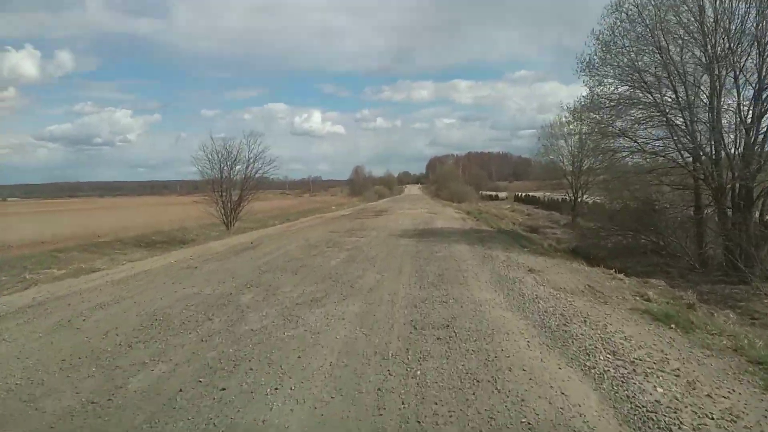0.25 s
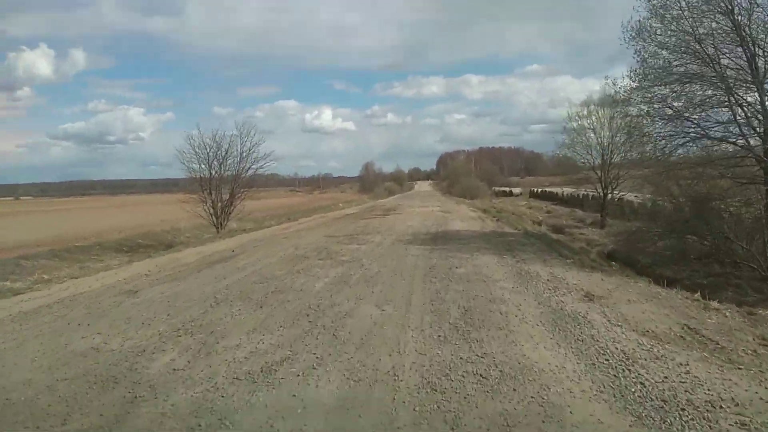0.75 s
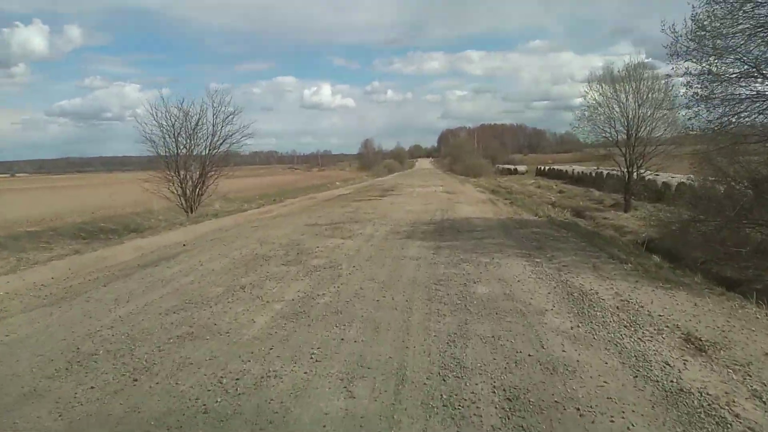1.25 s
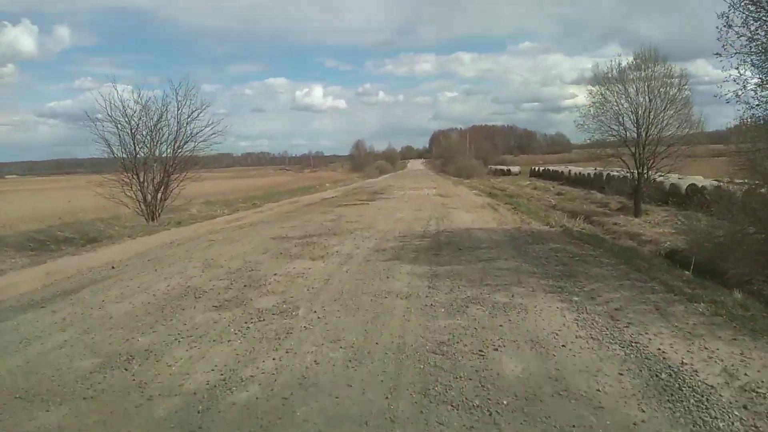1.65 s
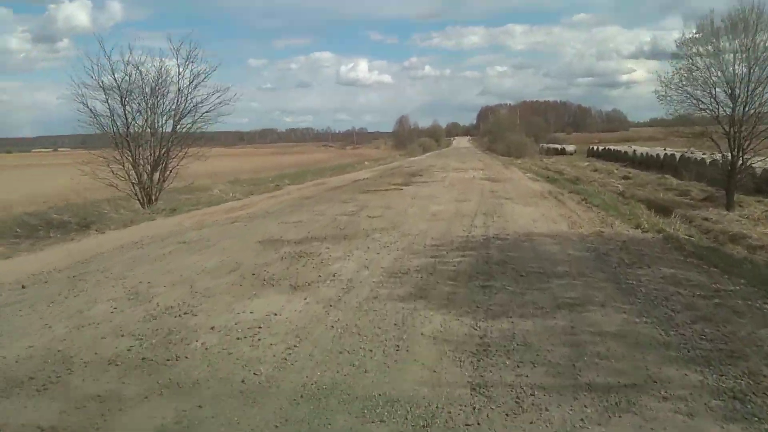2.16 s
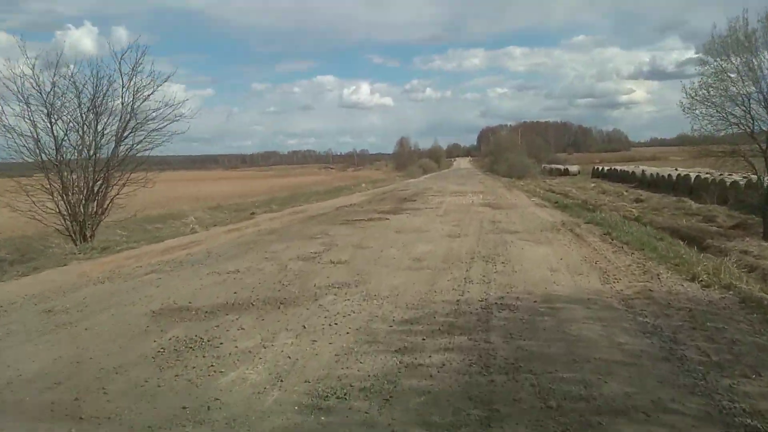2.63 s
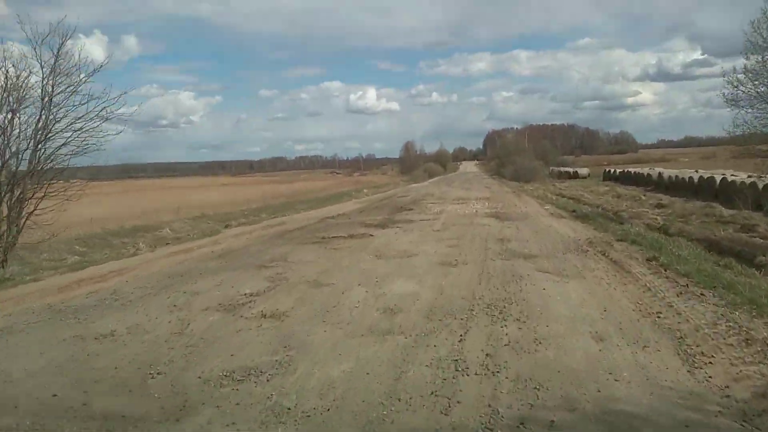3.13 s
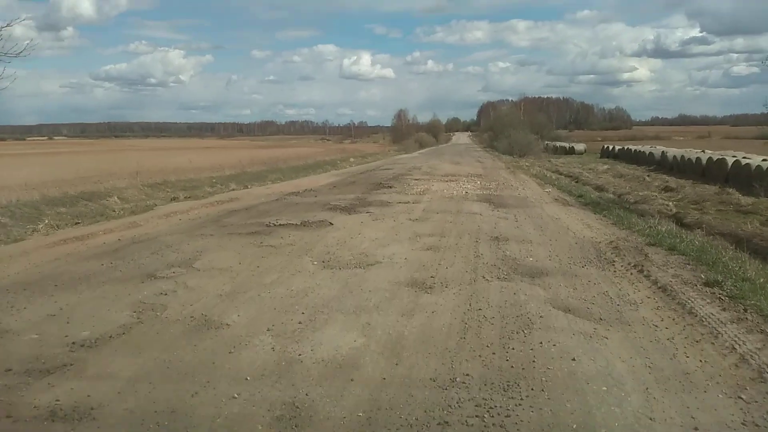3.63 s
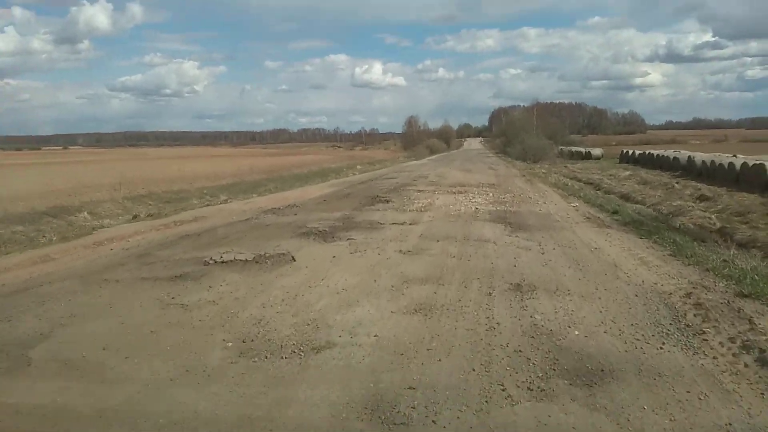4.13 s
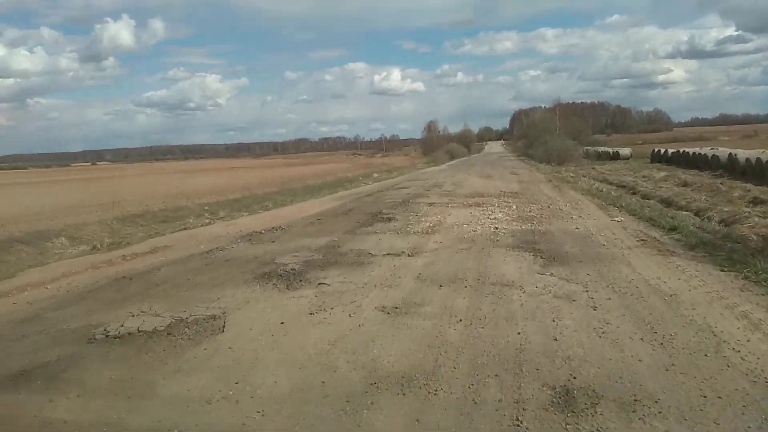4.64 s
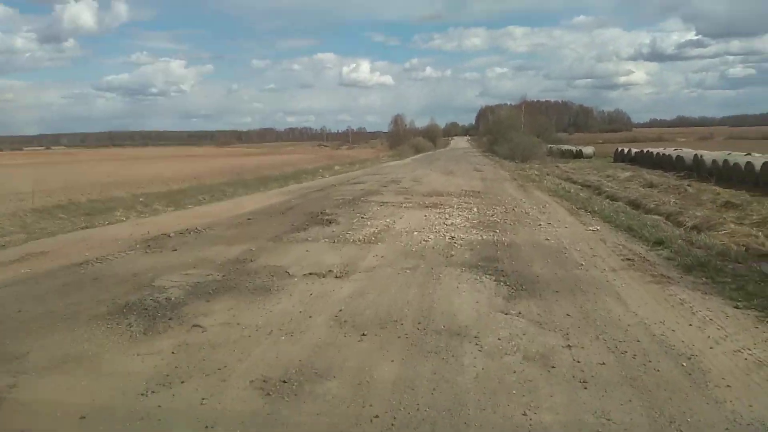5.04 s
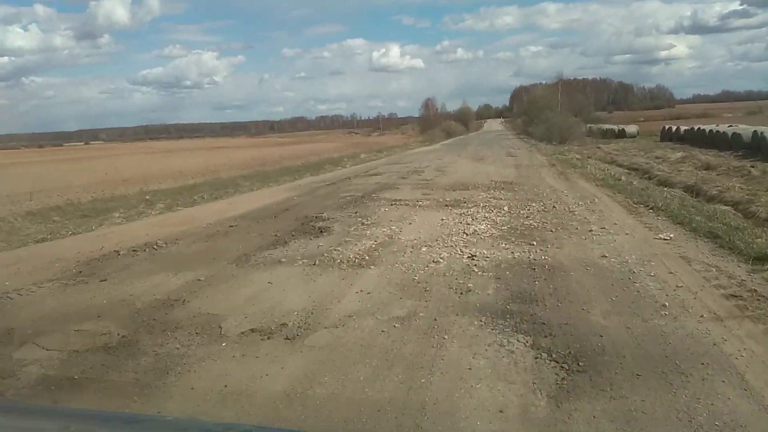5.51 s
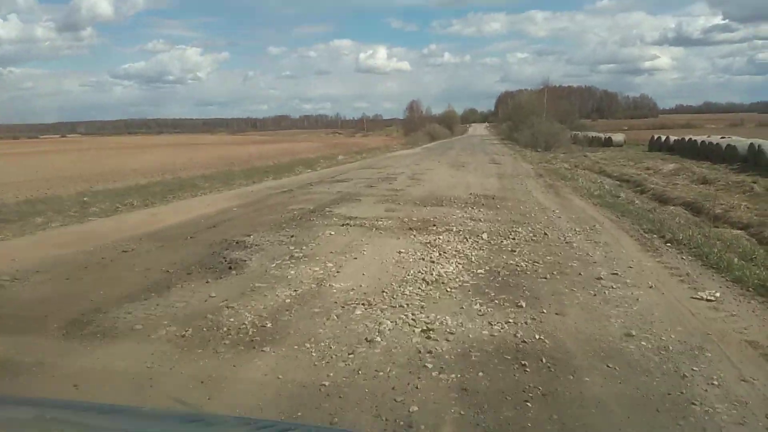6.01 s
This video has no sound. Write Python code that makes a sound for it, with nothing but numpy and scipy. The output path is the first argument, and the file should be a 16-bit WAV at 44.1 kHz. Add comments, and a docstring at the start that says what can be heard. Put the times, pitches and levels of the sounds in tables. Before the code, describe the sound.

A car drives over a potholed gravel road, heard from just behind the windscreen. A low boom fills the cabin while the tyres crunch over stones. Potholes bring frequent, uneven thumps and shudders, gravel sprays against the wheel arches in short bursts, and loose plastic trim ticks and rattles close by. The jolts bunch up around the middle, ease briefly near the end, then return.

```python
"""Gravel crunches and sprays against the underbody over a low boom: a car on a potholed road, heard
from a stereo microphone inside, just behind the windscreen. The road shakes the cabin air into that boom;
potholes knock through the suspension and make the body judder. Below the floor the tyres crush stones
and fling them at the wheel arches, while close by, loose trim ticks and rattles."""
import sys
import numpy as np
from scipy import signal
from scipy.fft import rfft, irfft, next_fast_len
from scipy.io import wavfile
from scipy.ndimage import uniform_filter1d

SR = 44100
rng = np.random.default_rng(int(sys.argv[2]) if len(sys.argv) > 2 else 0)


def bounce(signal):
    """Save signal as a 16-bit WAV file at the path given by the first command-line argument."""
    frames = np.transpose(np.atleast_2d(signal))
    limited = np.clip(frames, -1, 1)
    pcm = np.round(limited * 32767).astype(np.int16)
    wavfile.write(sys.argv[1], SR, pcm)


N = 276507

# potholes and ruts, levels before the mix: t/s, length/s, boom/dB, judder/dB, clunk/dB, first knock/dB
POTHOLES = [(0.065,0.059,-51,-30,-40.5,-46), (0.174,0.016,-43,-29.5,-33.5,-24),
            (0.233,0.069,-25.5,-28.5,-42.5,-16), (0.412,0.058,-40,-23.5,-45,-27),
            (0.78,0.073,-28,-30,-42.5,-24), (0.848,0.063,-44,-26.5,-45,-15.5),
            (1.072,0.12,-54,-30.5,-43,-20), (1.305,0.12,-49,-27,-41.5,-20), (1.447,0.11,-42,-28,-38.5,-21),
            (1.58,0.018,-42,-24,-47,-28), (1.799,0.12,-29.5,-35.5,-44.5,-53),
            (1.887,0.061,-33,-21.5,-36,-28), (2.016,0.034,-49,-30,-48,-26),
            (2.118,0.021,-28.5,-29,-45.5,-27), (2.168,0.082,-33,-30.5,-41.5,-15),
            (2.259,0.091,-46,-26.5,-42.5,-24), (2.408,0.08,-34,-31.5,-42.5,-25.5),
            (2.559,0.02,-24,-25.5,-40.5,-28), (2.609,0.063,-23,-31.5,-43,-17),
            (2.912,0.11,-52,-32.5,-47,-51), (3.103,0.13,-30.5,-25.5,-48.5,-14),
            (3.221,0.13,-27,-23.5,-40,-21), (3.372,0.09,-32,-27.5,-40.5,-19.5),
            (3.571,0.061,-34,-25,-47,-16.5), (3.672,0.025,-43,-28.5,-49,-20.5),
            (3.804,0.11,-28.5,-27,-40.5,-30), (4.037,0.096,-36,-27,-48.5,-14.5),
            (4.429,0.043,-30.5,-25,-41.5,-11.5), (4.78,0.044,-36.5,-37,-82,-37),
            (4.862,0.046,-30,-29.5,-54,-16.5), (5.007,0.077,-26.5,-23.5,-48.5,-26),
            (5.07,0.11,-26.5,-23.5,-51,-44), (5.29,0.0062,-40,-40,-60,-23),
            (5.331,0.069,-28.5,-66,-65.5,-56), (5.737,0.073,-54,-27,-45.5,-48),
            (5.864,0.018,-32.5,-26.5,-58,-38), (5.983,0.021,-49,-27.5,-66,-20),
            (6.065,0.039,-32,-23.5,-41.5,-23)]
def bumps():
    """Gains of boom, judder and clunk as a wheel runs through a pothole; each dies at its own rate."""
    boom_gain = swell([(s, length, 0.015, db) for s, length, db, *_ in POTHOLES], release_s=0.046)
    judder_gain = swell([(s, length, 0.0043, db) for s, length, _, db, *_ in POTHOLES], release_s=0.035)
    clunk_gain = swell([(s, length, 0.0043, db) for s, length, *_, db, _ in POTHOLES], release_s=0.041)
    return boom_gain, judder_gain, clunk_gain


# the road between potholes: t/s, crunch level/dB, boom level/dB
ROAD_SURFACE = [(0.0, -39, -34.5), (0.249, -61, -30.5), (0.327, -42.5, -30.5), (1.242, -41.5, -33.5),
                (1.668, -42.5, -36), (2.707, -41.5, -30), (2.789, -43.5, -38), (3.319, -44, -39),
                (3.522, -53.5, -34), (3.59, -42, -31), (4.257, -45, -36), (4.746, -59, -38.5),
                (4.881, -46, -52), (5.268, -45.5, -40), (5.538, -61.5, -35), (5.664, -59, -50),
                (5.846, -44, -36.5), (6.27, -48.5, -47)]
def rolling():
    """Gains of boom, judder, clunk, crunch, rattle and grit that the rolling tyres keep up."""
    s, *levels = np.transpose(ROAD_SURFACE)
    crunch_db, boom_db = [np.interp(np.arange(N) / SR, s, db) for db in levels]
    judder_db = boom_db - 17
    coarseness_db = crunch_db + 40   # zero on coarse gravel; the next three fade fast on finer ground
    clunk_db = -43 + 3.47 * coarseness_db
    rattle_db = -47.5 + 4.06 * coarseness_db
    grit_db = -58 + 3.9 * coarseness_db
    return from_db([boom_db, judder_db, clunk_db, crunch_db, rattle_db, grit_db])


# spectrum of the cabin air around the microphone: f/Hz, level/dB
BOOM_SPECTRUM = [(12, -10), (30, -23), (45, -24.5), (58, 3), (71, 1.5), (90, 1), (112, -11), (150, -7),
                 (220, -40)]
def boom():
    """The air of the cabin swings near its lowest resonance, stronger on the left."""
    swing, side = colour(rng.standard_normal((2, N)), BOOM_SPECTRUM)
    return even(swing, span_s=0.027) * pan(left_db=6.2) + 0.22 * antiphase(side)


# spectrum of the shaking body: f/Hz, level/dB
JUDDER_SPECTRUM = [(85, -17.5), (125, 0.5), (160, -2), (192, 3), (215, -6.5), (260, -7.5), (320, -24),
                   (400, -25)]
def judder():
    """Stones under the tread thump the body in quick, uneven succession."""
    middle = even(colour(impacts(per_s=560, spread_db=1), JUDDER_SPECTRUM), span_s=0.077)
    side = even(colour(impacts(per_s=460, spread_db=-2.5), JUDDER_SPECTRUM), span_s=0.047)
    side = butter(side, 1, 330, "high")   # short waves differ between left and right
    return middle * pan(left_db=2.5) + 0.5 * antiphase(side)


# modes of the car body, all round the microphone: f/Hz, level/dB, t60/s
BODY_RESONANCES = [(87.35, -14.5, 0.72), (132, 3.5, 0.021), (176.8, 4, 0.13), (190.4, 3.5, 0.13),
                   (238, -3, 0.036), (286, -4, 0.029), (367.6, -11.5, 0.1), (410, -12.5, 0.034)]
def knocks(delay_s):
    """Once the tyre is squashed, a pothole's edge strikes every body mode; clunks wake the upper ones."""
    s, _, _, judder_db, clunk_db, knock_db = np.transpose(POTHOLES)
    hardness_db = 14 + clunk_db - judder_db
    variation_db = 0.41 * rng.standard_normal((len(s), len(BODY_RESONANCES)))
    out = np.zeros((2, N))
    for k, (hz, db, t60) in enumerate(BODY_RESONANCES):
        low, upper = hz < 110, hz > 255
        blow_db = knock_db - 6 + db + upper * hardness_db + variation_db[:, k]
        blows = np.zeros(N)
        blows[((s + delay_s) * SR).astype(int)] = from_db(blow_db)
        out += (-1) ** k * ring(blows, hz, t60) * pan(left_db=7 if low else 0 if upper else 2.2)
    return out


# hard blows to the suspension, below and to the left: t/s, level/dB, f/Hz
SUSPENSION_BLOWS = [(0.248, -24, 130), (0.318, -31, 186), (0.415, -21, 136), (0.444, -19.5, 175),
                    (0.854, -22.5, 147), (1.332, -26, 200), (1.602, -17.5, 80), (1.895, -15, 111),
                    (1.9, -20, 279), (2.268, -24, 83.6), (2.417, -21, 147), (3.159, -21, 74),
                    (3.204, -16, 151), (3.311, -12, 77), (3.339, -23, 108), (3.392, -17.5, 303),
                    (3.578, -27, 207), (3.607, -19.5, 79), (3.85, -28, 267), (3.935, -23, 80.6),
                    (4.127, -27, 89), (4.451, -22.5, 290), (5.011, -17.5, 170), (5.094, -32, 89),
                    (5.147, -19, 148)]
def thumps(cycles, hollow_hz, hollow_db, hollow_t60):
    """The body heaves for a few damped swings, and the hollow of the wheel well rings above it."""
    out, blow = np.zeros((2, N + SR)), signal.unit_impulse(SR // 4)
    for s, db, hz in SUSPENSION_BLOWS:
        detune = np.exp(rng.standard_normal() / 10)
        hollow = from_db(hollow_db) * ring(blow, hollow_hz * detune, hollow_t60)
        heave = ring(blow, hz, cycles / hz) * pan(left_db=4.5)
        place(out, heave - hollow, s, db)
    return butter(out[:, :N], 2, [25, 600])


# modes of the wheel arches, heard through the floor: f/Hz, width/Hz, level/dB
ARCH_RESONANCES = [(631, 53, 3), (716, 80, 0), (869.5, 29.5, 1.5), (1042, 71, 1), (1148, 56, -7.5),
                   (1356, 43, -2.5), (1957, 130, -10)]
def crunch(gain, wander_db):
    """Crushed stones ring the arches' modes by turns; the top mode fades when the crunch is quiet."""
    crushing = clatter(391, 2750, per_s=380, spread_db=4, t60=0.039, variety_db=0, hold_s=0.069, count=3)
    top_mode_gain = np.minimum(gain / from_db(-46.5), 1)
    out = 0
    for hz, width_hz, db in ARCH_RESONANCES:
        crossfeed = 0.25 if hz < 950 else -0.05
        mode = resonate_twice(crushing + crossfeed * crushing[::-1], hz, 2 * width_hz)
        strength = from_db(db + wander_db * wander(span_s=0.069))
        out = out + strength * mode * (top_mode_gain if hz > 1500 else 1)
    return gain * even(out, span_s=0.18) * pan(left_db=3)


# gravel flung at the underbody: t/s, length/s, rise/s, rattle level/dB, grit level/dB
GRAVEL_SPRAYS = [(0.023,0.14,0.052,-38,-47), (0.224,0.055,0.0076,-47.5,-57.5), (0.405,0.14,0.006,-47,-57),
                 (0.575,0.038,0.024,-53.5,-60), (0.713,0.2,0.064,-49.5,-54), (0.917,0.15,0.0092,-56,-54),
                 (1.311,0.025,0.016,-45,-60), (1.414,0.088,0.091,-39.5,-45.5), (1.714,0.12,0.0077,-64,-66),
                 (1.866,0.1,0.01,-54,-53.5), (2.003,0.12,0.035,-54.5,-61), (2.226,0.097,0.015,-56,-52),
                 (2.399,0.18,0.016,-47,-52), (2.622,0.024,0.029,-61,-54), (2.861,0.14,0.031,-45,-53.5),
                 (3.178,0.18,0.1,-42,-53), (3.551,0.042,0.0097,-56,-63), (3.648,0.066,0.022,-51.5,-65),
                 (3.771,0.24,0.085,-49,-57), (4.022,0.096,0.02,-54.5,-62.5), (4.412,0.041,0.024,-61,-52.5),
                 (4.488,0.097,0.032,-49.5,-55), (4.733,0.087,0.007,-85,-68), (4.859,0.033,0.01,-66,-57),
                 (4.996,0.072,0.015,-79,-60), (5.169,0.019,0.019,-46.5,-68), (5.519,0.053,0.014,-77,-70.5),
                 (5.732,0.058,0.0087,-51.5,-60), (5.802,0.051,0.012,-52.5,-48.5),
                 (5.971,0.013,0.0065,-62,-58), (6.011,0.18,0.14,-42,-50.5)]
def sprays():
    """Gains of rattle and grit: each spray off the tyres builds up and thins out."""
    rattle_gain = swell([(*timing, db) for *timing, db, _ in GRAVEL_SPRAYS], release_s=0.043)
    grit_gain = swell([(*timing, db) for *timing, _, db in GRAVEL_SPRAYS], release_s=0.041)
    return rattle_gain, grit_gain


# spectrum of the pebbles from inside the car: f/Hz, level/dB
RATTLE_SPECTRUM = [(600, 12.5), (1000, 4.5), (1650, -2.5), (2020, 3), (2350, 0.5), (2620, -6.5), (3050, -5),
                   (5000, -17), (7000, -18)]
def rattle():
    """Pebbles and loose plastic clatter in dense clicks."""
    clicks = clatter(726, 7920, per_s=330, spread_db=3, t60=0.23, variety_db=8.5, hold_s=0.024, count=11)
    pebbles = scatter(per_s=450, spread_db=2, t60=0.034, hold_s=0.091, count=2)
    return colour(clicks + from_db(10) * pebbles, RATTLE_SPECTRUM) * pan(left_db=-1.1)


# spectra of fine grit at each side of the microphone: f/Hz, level/dB
GRIT_LEFT_SPECTRUM = [(3000, -4), (5000, 1), (7300, 5), (9000, 1.5), (10500, -4.5), (13000, -11),
                      (15300, -21)]
GRIT_RIGHT_SPECTRUM = [(3000, -2), (5000, -10), (8500, -8), (10500, -9), (13000, -9.5), (15300, -26)]
def grit():
    """Fine grains hiss and prickle; the very top comes through best on the right."""
    clicks = clatter(2520, 16900, per_s=340, spread_db=11.5, t60=0.16, variety_db=14,
                     hold_s=0.037, count=8)
    grains = scatter(per_s=480, spread_db=3.5, t60=0.1, hold_s=0.089, count=4)
    left, right = clicks + from_db(6) * grains
    return np.array([colour(left, GRIT_LEFT_SPECTRUM), colour(right, GRIT_RIGHT_SPECTRUM)])


def stone_hits(per_s, spread_db, low_hz, high_hz, cycles, tilt_db, count):
    """Larger stones in a spray hit one by one, each a dry clack with the pitch of its own spot; rms 1."""
    hits, spot, out = impacts(per_s, spread_db), rng.integers(0, count, N), 0
    for k, hz in enumerate(np.geomspace(low_hz, high_hz, count)):
        rings = ring(hits * (spot == k), hz, cycles / hz) * np.sqrt(hz / low_hz)
        out = out + from_db(tilt_db * np.log2(hz / low_hz)) * rings * pan(left_db=rng.normal(0, 5))
    return rms_one(0.5 * antiphase(out) + cabin(out.mean(axis=0), t60=0.056, direct=0.042))


# big stones and suspension parts hit a wheel arch: t/s, level/dB
ARCH_BLOWS = [(0.177, -28), (0.237, -21.5), (0.446, -28.5), (0.502, -29), (1.218, -34), (1.887, -39),
              (2.408, -35), (2.658, -30), (3.108, -27.5), (3.264, -27), (3.313, -23.5), (3.344, -24.5),
              (5.139, -31), (5.198, -31), (5.272, -30), (5.776, -30.5)]
def clacks(bounce_s, bounce_db, damping, variety_db):
    """A hard blow and one bounce ring the arch modes, with other strengths for each blow and side."""
    s, blow_db = np.transpose(ARCH_BLOWS)
    chance = rng.standard_normal((len(s), len(ARCH_RESONANCES), 2))
    bounce_at = s + bounce_s * rng.uniform(0.5, 1.5, len(s))
    out = np.zeros((2, N))
    for k, (hz, width_hz, db) in enumerate(ARCH_RESONANCES):
        strength = from_db(blow_db + db + variety_db * chance[:, k].T)
        if hz > 950:   # short waves reach left and right out of step
            strength = strength * np.sign(chance[:, k, ::-1].T)
        blows = np.zeros((2, N))
        blows[:, (s * SR).astype(int)] = strength
        blows[:, (bounce_at * SR).astype(int)] += from_db(bounce_db) * strength
        out += (-1) ** k * ring(blows, hz, t60=np.log(1000) / (np.pi * width_hz * damping))
    return out


# single stones off metal, outside the cabin: t/s, level/dB, f/Hz
STONE_PINGS = [(0.048, -47.5, 7060), (0.1062, -43, 7700), (0.2157, -49, 3930), (0.543, -59, 7500),
               (0.738, -60, 12500), (1.248, -56, 8450), (1.71, -55.5, 7600), (1.775, -76, 7850),
               (4.7397, -62, 8760), (4.829, -61, 10500), (5.006, -60, 8000), (5.437, -66, 7440),
               (5.5064, -65, 6300), (5.532, -59, 2940), (5.8136, -47.5, 9100), (5.819, -51.5, 3430),
               (6.108, -46.5, 6830)]
def pings(t60, partials_db, snap_db):
    """A lone stone skips against a small metal part: a broad crack, a brief ring of unrelated partials."""
    out, strike = np.zeros((2, N + SR)), signal.unit_impulse(SR // 5)
    for (s, db, hz), ratios in zip(STONE_PINGS, rng.uniform(0.6, 1.35, (len(STONE_PINGS), 6))):
        partials = from_db(partials_db) * sum(ring(strike, hz * ratio, t60) for ratio in ratios)
        crack = from_db(snap_db) * resonate(strike, hz, hz / 2)
        ping = ring(strike, hz, t60) + partials + crack
        place(out, cabin(ping, t60=0.06, direct=0), s, db)
    return out[:, :N]


# loose trim close to the microphone: t/s, level/dB
TRIM_TICKS = [(0.101, -29.5), (0.1237, -26), (0.2346, -30), (0.377, -42), (0.447, -34), (0.504, -45),
              (0.781, -37.5), (0.8553, -35), (1.081, -35), (1.319, -42), (1.447, -33), (1.797, -46),
              (1.887, -31.5), (1.9622, -35), (2.308, -36.5), (2.41, -36.5), (2.558, -36), (2.8759, -36),
              (3.108, -36.5), (3.1853, -35), (3.223, -35.5), (3.264, -31.5), (3.896, -33.5), (3.935, -35),
              (4.165, -44), (4.465, -40.5), (4.5155, -41.5), (5.037, -47), (5.0848, -37), (5.9761, -38)]
def ticks(typical_hz, bounce_s, t60, octave_db, snap_db, hollow_db, hollow_t60):
    """Trim snaps against its seat and bounces twice; the hollow behind it rings lower and longer."""
    out, length = np.zeros((2, N + SR)), SR // 10
    for (s, db), (size, *gaps) in zip(TRIM_TICKS, rng.uniform(0.516, 2.2, (len(TRIM_TICKS), 3))):
        hz = typical_hz / size ** 0.43
        touches = signal.unit_impulse(length)
        touches[(np.cumsum(gaps) * bounce_s * SR).astype(int)] = from_db([-5, -11])
        tick = ring(touches, hz, t60) + from_db(snap_db) * touches
        tick += from_db(octave_db) * ring(touches, hz * 2, t60 / 2)
        tick += from_db(hollow_db) * ring(touches, hz * 0.515, hollow_t60)
        place(out, cabin(tick, t60=0.026, direct=0.25), s, db)
    return butter(out[:, :N], 1, [600, 9000])


# spectrum of the panels, within arm's reach: f/Hz, level/dB
PANEL_SPECTRUM = [(230, -4), (300, 5), (345, -1), (390, 6), (480, 3), (540, -5), (650, -4)]
def panels():
    """Door and dashboard panels clunk against their fixings."""
    middle, side = [even(colour(impacts(per_s=350, spread_db=0.5), PANEL_SPECTRUM), span_s=0.0088)
                    for _ in range(2)]
    return middle * pan(left_db=-1.5) + 0.52 * antiphase(side)


# modes of a loose plastic cover in the cabin: f/Hz
COVER_MODES = [2017, 2300, 3017]
def cover(per_s, spread_db, width_hz, tilt_db):
    """The cover chatters on its clips; each touch rings its modes with other strengths."""
    touches, out = impacts(per_s, spread_db), 0
    for hz in COVER_MODES:
        mode = resonate_twice(touches * rng.standard_normal((2, N)), hz, width_hz)
        out = out + from_db(tilt_db * np.log2(hz / COVER_MODES[0])) * mode
    return even(rms_one(out), span_s=0.053)


def air():
    """Air slipping past the windscreen keeps up a high hiss."""
    return colour(rng.standard_normal((2, N)), [(7000, -0.44), (12000, -0.56)])


def impacts(per_s, spread_db):
    """Random contacts of uneven strength and either sign."""
    sizes = from_db(spread_db * np.minimum(rng.exponential(1, N), 4)) * rng.choice([-1, 1], N)
    return sizes * (rng.random(N) < per_s / SR)


def clatter(low_hz, high_hz, per_s, spread_db, t60, variety_db, hold_s, count):
    """Random collisions, each a dying burst with its own colour across count bands; stereo, rms 1."""
    hits = impacts(per_s, spread_db)
    at = np.flatnonzero(hits)
    white = rng.standard_normal((2, 2, N))
    edges = np.geomspace(low_hz, high_hz, count + 1)
    energy_decay = from_db(-120 / (t60 * SR))
    out = 0
    for k in range(count):
        energy = np.zeros(N)
        energy[at] = (hits[at] * from_db(variety_db * rng.standard_normal(len(at)))) ** 2
        envelope = np.sqrt(signal.lfilter([1], [1, -energy_decay], energy + 1e-12))
        out = out + butter(white[k % 2], 2, edges[k:k + 2]) * even(envelope, hold_s)
    return rms_one(out)


def scatter(per_s, spread_db, t60, hold_s, count):
    """Stones pepper a few spots in clumps; each spot reaches the cabin with its own hollow colour."""
    out = 0
    for _ in range(count):
        clumps = from_db(7.3 * wander(span_s=0.021))
        out = out + cabin(clumps * impacts(per_s / count, spread_db), t60, direct=0.021)
    return even(out, hold_s)


def cabin(x, t60, direct):
    """Dense short reflections from glass and dashboard, different for each side and each source."""
    t = np.arange(SR // 8) / SR
    echoes = rng.standard_normal((2, len(t))) * from_db(-60 * t / t60)
    echoes /= np.sqrt(np.sum(echoes ** 2, axis=1, keepdims=True))
    echoes[:, 0] += direct
    return signal.oaconvolve(x[None], echoes, axes=1)[:, :len(x)] / np.sqrt(1 + direct ** 2)


def swell(rows, release_s):
    """Gain of events (t/s, length/s, rise/s, level/dB) that rise, hold and die away; powers add."""
    t, power = np.arange(N) / SR, np.zeros(N)
    for s, length_s, rise_s, db in rows:
        start = int(s * SR)
        since = t[:min(SR, N - start)]
        rise = np.minimum(since / rise_s, 1)
        fall = np.exp(-np.maximum(since - length_s, 0) / release_s)
        power[start:start + len(since)] += (from_db(db) * rise * fall) ** 2
    return np.sqrt(power)


def colour(x, points):
    """Give a steady sound a spectrum (f/Hz, level/dB), falling steeply past its ends; rms 1."""
    hz, db = np.transpose(points)
    size = next_fast_len(N)
    log_hz = np.log(np.fft.rfftfreq(size, 1 / SR) + 1e-3)
    outside = np.abs(log_hz - np.clip(log_hz, np.log(hz[0]), np.log(hz[-1])))
    gain = from_db(np.interp(log_hz, np.log(hz), db) - 40 * outside)
    return rms_one(irfft(rfft(x, size) * gain, size)[..., :N])


def ring(clicks, hz, t60):
    """A unit click sets a sine of height 1 ringing."""
    r, w = from_db(-60 / (t60 * SR)), 2 * np.pi * min(hz, SR * 0.45) / SR
    return signal.lfilter([0, np.sin(w)], [1, -2 * r * np.cos(w), r * r], clicks + 1e-18)


def resonate(x, hz, width_hz):
    """A resonance with gain 1 on top."""
    return signal.lfilter(*signal.iirpeak(hz, hz / width_hz, fs=SR), x)


def resonate_twice(x, hz, width_hz):
    """Two resonances in series: a narrower peak with steeper skirts."""
    return resonate(resonate(x, hz, width_hz), hz, width_hz)


def butter(x, order, hz, kind="band"):
    return signal.sosfilt(signal.butter(order, hz, kind, fs=SR, output="sos"), x)


def smooth(x, span_s):
    width = int(span_s * SR)
    return uniform_filter1d(uniform_filter1d(x, width), width)


def even(x, span_s):
    """Hold the strength of a random vibration steady over spans longer than span_s."""
    power = np.mean(np.atleast_2d(x) ** 2, axis=0)
    return x / np.sqrt(smooth(power, span_s) + 1e-9)


def wander(span_s):
    """A random drift that turns about once in span_s; spread about 1."""
    return np.clip(rms_one(smooth(rng.standard_normal(N), span_s)), -2, 2)


def together(*gains):
    """Unrelated vibrations add in power."""
    return np.sqrt(sum(gain ** 2 for gain in gains))


def pan(left_db):
    """Left and right gains whose mean is one."""
    sides = from_db([[left_db / 2], [-left_db / 2]])
    return sides / sides.mean()


def antiphase(x):
    """Opposite signs left and right widen the image."""
    return x * [[1], [-1]]


def place(out, sound, s, db):
    start = int(s * SR)
    out[:, start:start + sound.shape[1]] += from_db(db) * sound


def from_db(db):
    return 10 ** (np.asarray(db) / 20)


def rms_one(x):
    return x / np.sqrt(np.mean(x ** 2) + 1e-20)


def scene():
    """From behind the windscreen: rolling, potholes and sprays shake the same body, arches and panels."""
    road_boom, road_judder, road_clunk, road_crunch, road_rattle, road_grit = rolling()
    bump_boom, bump_judder, bump_clunk = bumps()
    spray_rattle, spray_grit = sprays()
    # potholes also crush and shake stones, and sprays also ring the arches
    crunch_gain = together(road_crunch, from_db(-4.5) * bump_clunk, from_db(3) * spray_rattle)
    rattle_gain = together(road_rattle, spray_rattle, from_db(-15) * bump_clunk)
    cover_gain = together(bump_judder, road_crunch) ** 0.74   # the buzz grows more slowly than the shake

    body = from_db(-1.5) * together(road_boom, bump_boom) * boom()
    body += from_db(-2.5) * together(road_judder, bump_judder) * judder()
    body += knocks(delay_s=0.0058)
    body += thumps(cycles=13.8, hollow_hz=330, hollow_db=-12.5, hollow_t60=0.065)

    gravel = from_db(-3.5) * crunch(crunch_gain, wander_db=2.5)
    gravel += from_db(2) * rattle_gain * rattle()
    gravel += from_db(0.8) * together(road_grit, spray_grit) * grit()
    gravel += from_db(5.5) * pings(t60=0.026, partials_db=-6, snap_db=23)

    trim = from_db(0.3) * together(road_clunk, bump_clunk) * panels()
    trim += from_db(-45) * cover_gain * cover(per_s=220, spread_db=4, width_hz=61, tilt_db=1)
    trim += from_db(12) * ticks(typical_hz=1970, bounce_s=0.0045, t60=0.0017, octave_db=-7,
                                snap_db=-2, hollow_db=-9, hollow_t60=0.0084)

    hits = stone_hits(per_s=170, spread_db=2, low_hz=1270, high_hz=10500, cycles=19,
                      tilt_db=-1.9, count=40)
    pelting = from_db(-6.5) * together(spray_rattle, spray_grit) * hits
    hiss = from_db(-80) * air()
    arch_clacks = from_db(-14.5) * clacks(bounce_s=0.009, bounce_db=1, damping=0.94, variety_db=3)
    return body + gravel + pelting + arch_clacks + trim + hiss


def record(dry):
    """At the microphone, the treble is cut steeply above 15.4 kHz."""
    return signal.sosfilt(signal.ellip(10, 0.2, 80, 15400, fs=SR, output="sos"), dry)


dry = scene()
out = record(dry)
bounce(out)
```